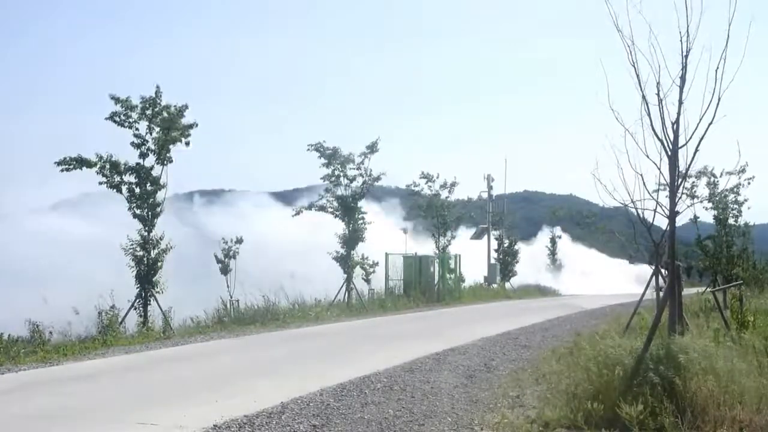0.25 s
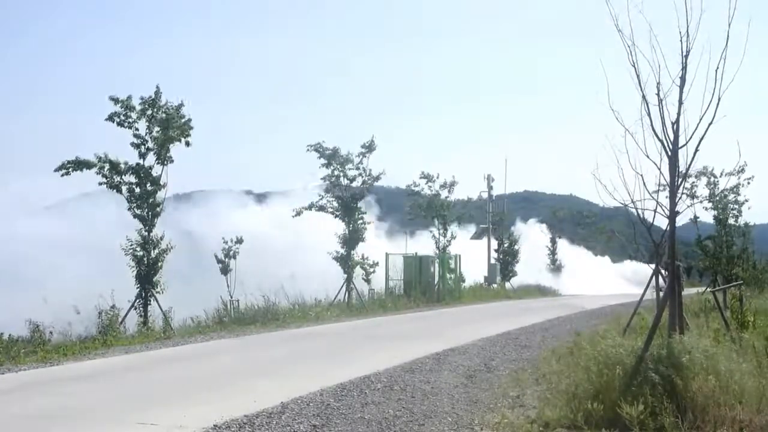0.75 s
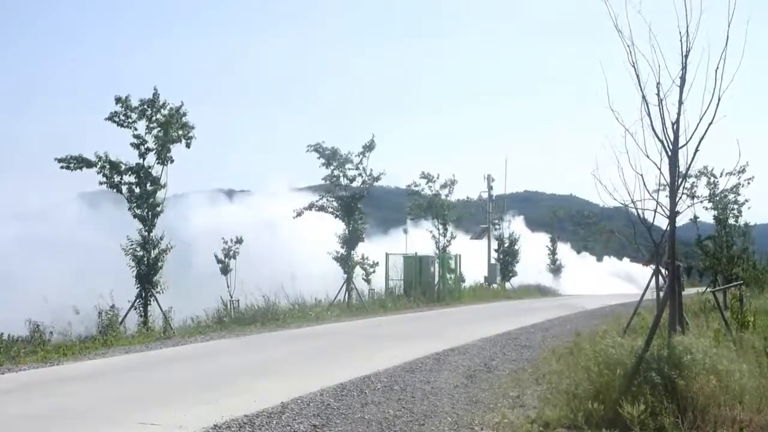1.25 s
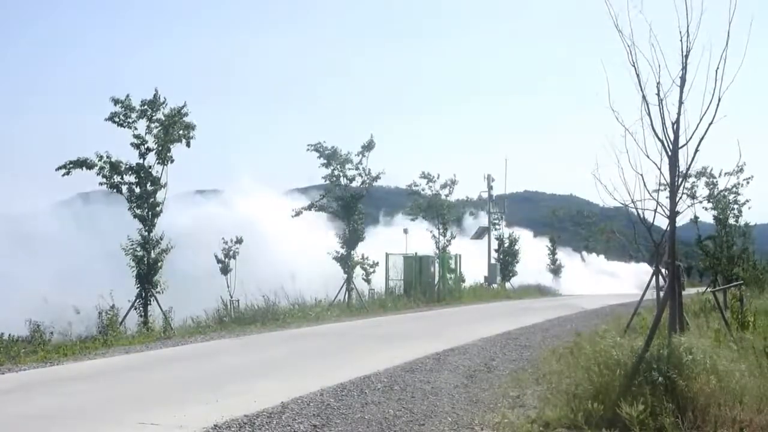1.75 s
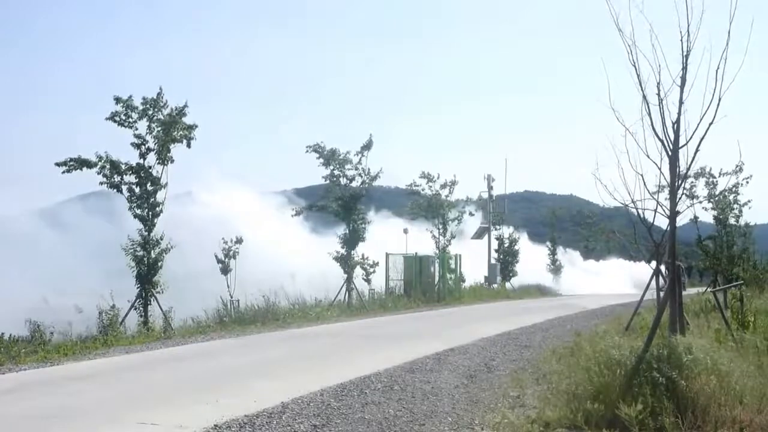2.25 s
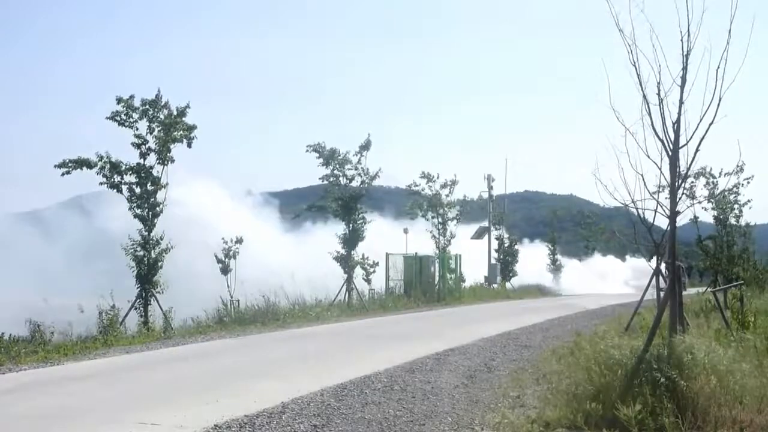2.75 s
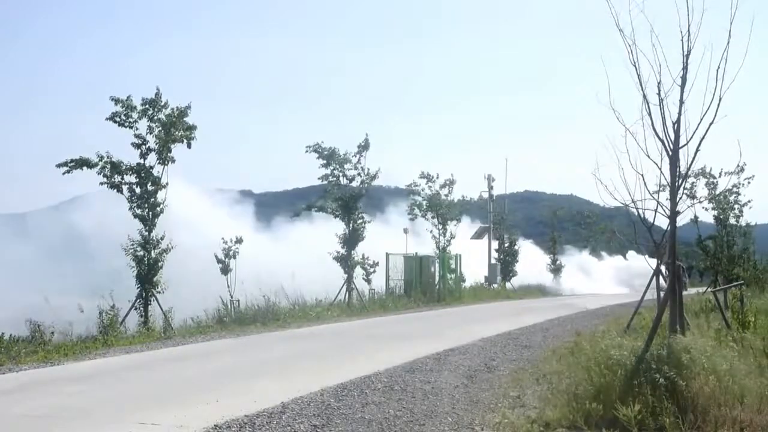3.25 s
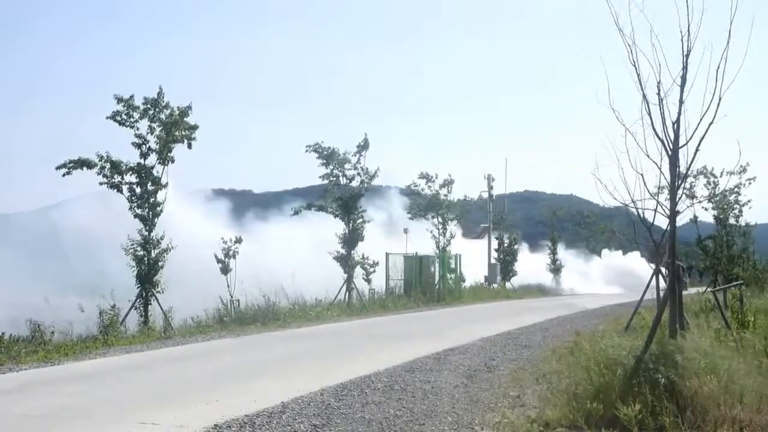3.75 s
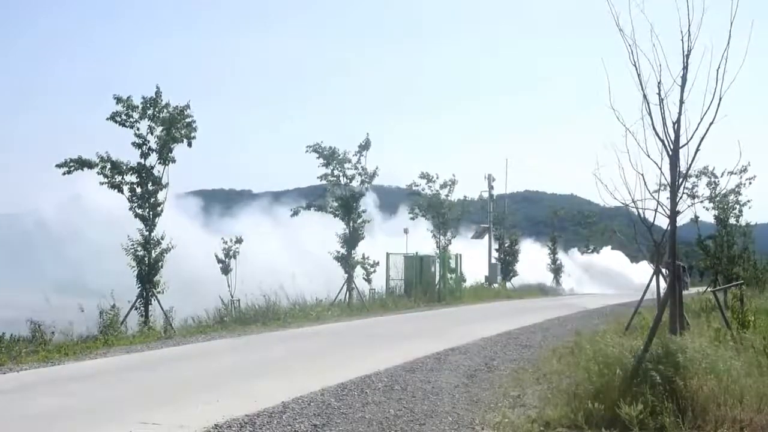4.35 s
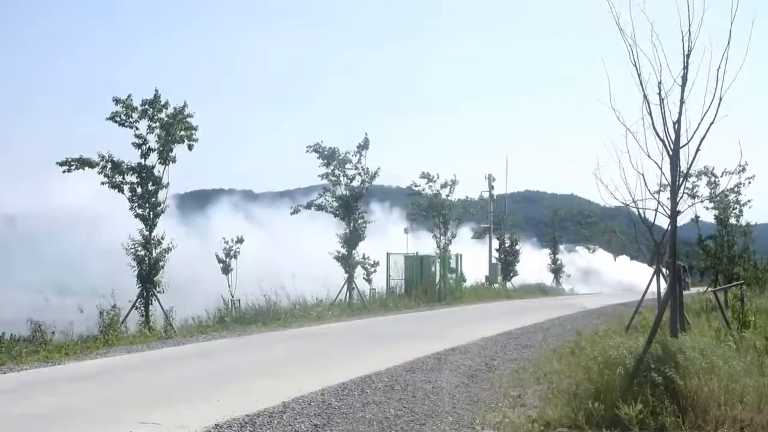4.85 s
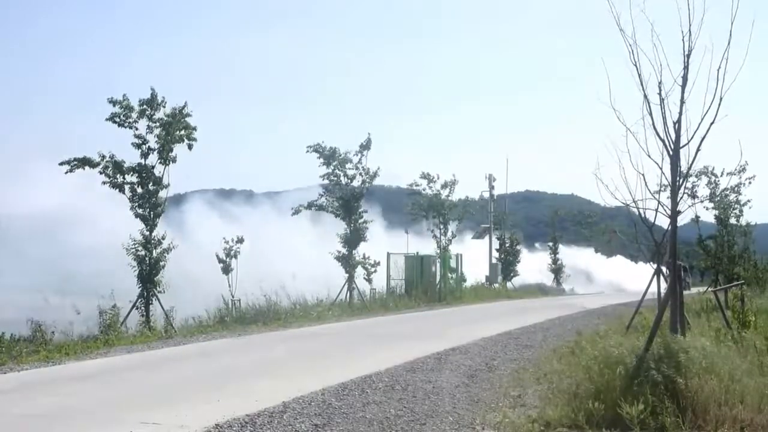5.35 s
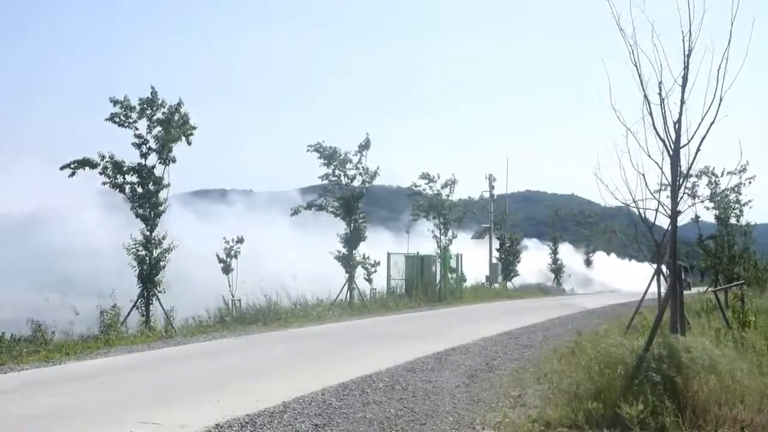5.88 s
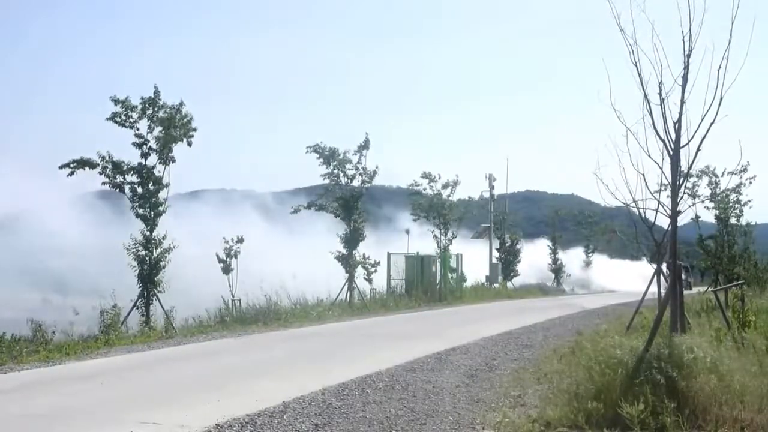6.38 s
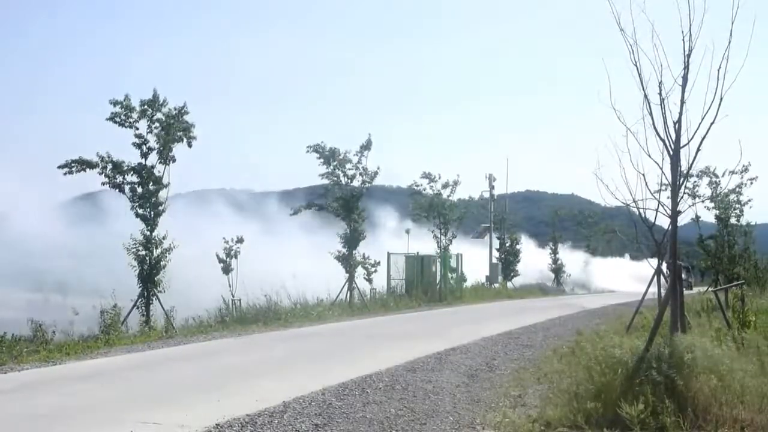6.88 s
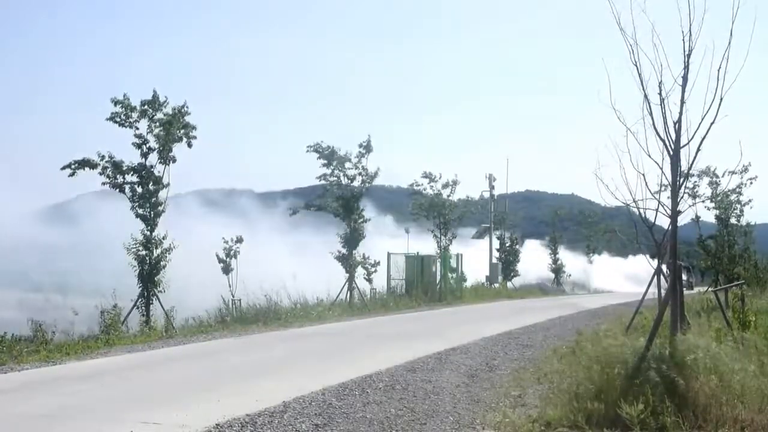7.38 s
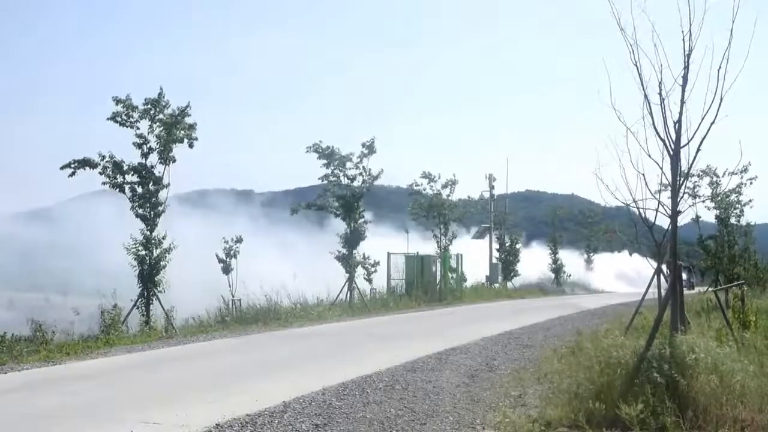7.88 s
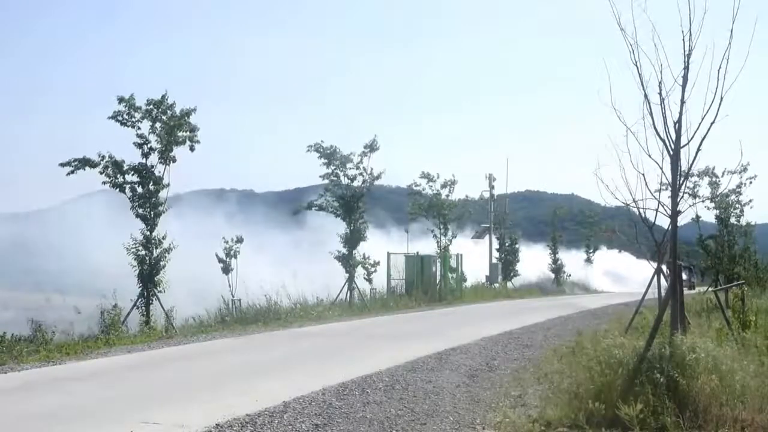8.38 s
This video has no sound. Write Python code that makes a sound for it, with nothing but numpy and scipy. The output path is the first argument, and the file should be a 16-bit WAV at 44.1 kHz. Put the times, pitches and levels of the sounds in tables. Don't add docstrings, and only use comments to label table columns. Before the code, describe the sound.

Outdoor roadside: a far-off buzzing engine drone with raspy roar under buffeting wind, faint hiss, a few bird chips and small close ticks.

```python
import sys
import numpy as np
from scipy import signal
from scipy.fft import rfft, irfft, next_fast_len
from scipy.io import wavfile
from scipy.ndimage import uniform_filter1d, map_coordinates

SR = 44100
rng = np.random.default_rng(int(sys.argv[2]) if len(sys.argv) > 2 else 0)


def generate_wav(signal):
    frames = np.transpose(np.atleast_2d(signal))
    scaled = np.clip(frames, -1, 1) * 32767
    pcm = np.round(scaled).astype(np.int16)
    wavfile.write(sys.argv[1], SR, pcm)


def level_to_linear(level):
    exponent = np.asarray(level, float) / 20
    return 10 ** exponent


N = 380274


def unit(x):
    return x / np.sqrt(np.mean(x ** 2) + 1e-20)


def along(points, hz):
    f, v = np.transpose(points)
    return np.interp(np.log(hz + 1), np.log(f + 1), v)


def curves(rows):
    s, *cols = np.transpose(rows)
    return [np.interp(np.arange(N) / SR, s, c) for c in cols]


def wobble(rate_hz):
    coarse = np.arange(0, N + 64, 64)
    knots = rng.standard_normal(1000)
    return np.interp(np.arange(N), coarse, map_coordinates(knots, [coarse * rate_hz / SR]))


def filtered(x, response):
    m = next_fast_len(N + SR // 2)
    return irfft(rfft(x, m) * response(np.fft.rfftfreq(m, 1 / SR)), m)[..., :N]


def coloured(spectrum):
    return unit(filtered(rng.standard_normal(N), lambda hz: level_to_linear(along(spectrum, hz))))


def even(x, span_s):
    return x / np.sqrt(np.abs(uniform_filter1d(x ** 2, size=int(span_s * SR))) + 0.027)


def swells(s, peak_db, half_s, calm_db):
    coarse = np.arange(0, N + 64, 64) / SR
    power = level_to_linear(2 * peak_db) @ np.exp(-((coarse - s[:, None]) / half_s) ** 2)
    return 10 * np.log10(np.interp(np.arange(N) / SR, coarse, power) + level_to_linear(2 * calm_db))


# time in seconds, gain just after in dB.
GAIN_DUCKS = [(0.0, -0.5), (.42, -2), (1.03, 0.9), (1.14, -1.5), (1.51, -1.1), (1.64, -2.5), (1.97, -1.5),
              (2.42, -2), (2.5, -4), (3.67, 3), (3.9, 0.4), (4.15, 0), (4.28, -2), (4.6, -1.5), (4.79, -4),
              (5.02, -4), (5.44, -4), (5.88, -4), (6.6, 4.5), (6.727, -.5), (6.96, -1.5), (7.35, -1),
              (7.71, 0), (8.23, 4), (8.55, 6)]
CLIMB_DB_PER_S, DUCK_S = 8.5, 0.027
LULL_START_S, LULL_END_S, LULL_EXTRA_DB_PER_S = 6.25, 6.56, 16.5


def gain_db():
    s, after_db = np.transpose(GAIN_DUCKS)
    t = np.arange(N) / SR

    def climb(t):
        return CLIMB_DB_PER_S * t + LULL_EXTRA_DB_PER_S * np.clip(t, LULL_START_S, LULL_END_S)

    last = np.clip(np.searchsorted(s, t, "right") - 1, 0, None)
    return uniform_filter1d(after_db[last] + climb(t) - climb(s[last]), size=int(DUCK_S * SR))


def resonant(x, modes, steep, turned=0):
    def response(hz):
        total = 0
        for k, (centre_hz, width_hz, db, *change_db) in enumerate(modes):
            peak = 1j * hz * width_hz / (centre_hz ** 2 - hz ** 2 + 1j * hz * width_hz)
            level = (-1) ** k * level_to_linear(db + turned * sum(change_db))
            total = total + level * peak * np.abs(peak) ** steep
        return total

    return unit(filtered(x, response))


# time in seconds, share turned 0-1.
TURNED_SHARE = [(0, 0), (1.5, 0), (3, 0.24), (4, 0), (4.6, 0.2), (5, 0.6), (6.3, .95), (7.4, .95),
                (8.62, 0.8)]


def swung(x, modes, steep):
    turn = np.clip(curves(TURNED_SHARE)[0], 0, 1)
    return (1 - turn) * resonant(x, modes, steep) + turn * resonant(x, modes, steep, turned=0.88)


def shimmer(x, patchy_db):
    z = signal.stft(x, nperseg=512)[2]
    field = uniform_filter1d(rng.standard_normal(z.shape[1:]), size=7, axis=0)
    field = uniform_filter1d(field, size=9, axis=1)
    return unit(signal.istft(z * level_to_linear(patchy_db * unit(field)), nperseg=512)[1][:, :N])


# frequency in Hz, likeness 0-1.
PORT_LIKENESS = [(200, 1), (1300, 0.86), (3000, 0.49), (6000, 0.73), (9000, 1)]


def spread(pair, lead_rad):
    def mid_side(hz):
        turn = np.arccos(np.clip(along(PORT_LIKENESS, hz), 0, 1)) / 2
        air = level_to_linear(-.9 * (hz / 3000) ** 2)
        return air * np.array([np.cos(turn), np.sin(turn)])

    def tilt(hz):
        phase = lead_rad * np.clip(hz / 1800, 0, 1)
        level = along([(1500, -0.1), (3000, 0.26), (6000, 0.23)], hz)
        return np.exp((1j * phase - level) * np.array([[.5], [-.5]]))

    mid, side = filtered(pair, mid_side)
    return filtered(np.array([mid + side, mid - side]), tilt)


# firing rate at start in Hz, at end in Hz, fundamental in dB before a fixed 36.5 dB
JET_RATES = [
    (80.75, 79.8, -36),
    (83.14, 84, -35),
]
# multiple of the firing rate, level in dB.
JET_ORDERS = [
    [(2, -1), (3.5, -14), (5, -21), (6, -15.5)],
    [(1.5, -11), (2, -4.5), (2.5, -16.5), (3.5, -13), (4, -18), (5, -44), (7, -24.5)],
]


def firings(drone_db, tube_db):
    tone, bursts = np.zeros(N), np.zeros(N)
    for (start_hz, end_hz, db), orders in zip(JET_RATES, JET_ORDERS):
        turns = np.cumsum(np.linspace(start_hz, end_hz, N) + .8 * wobble(4)) / SR
        for k, order_db in [(1, 0.0099), *orders]:
            level_db = db + 36.5 + order_db + 1.9 * wobble(5)
            if k > 3:
                level_db = level_db + tube_db - drone_db
            tone += level_to_linear(level_db) * np.sin(2 * np.pi * round(2 * k) / 2 * turns)
        strength_db = 3.6 * wobble(40) + 0.97 * (turns % 2 > 1)
        bursts += np.exp(-3.5 * (turns % 1)) * level_to_linear(strength_db)
    return tone, bursts


# centre in Hz, width in Hz, level in dB.
BODY_MODES = [(119, 35.3, -6.5), (189.8, 41.6, -4.5), (282.4, 18.6, -0.5), (321.8, 33, -7.5),
              (402, 15, -12), (466, 45, -14), (553, 29, -14), (588.3, 27, -11), (650.6, 44, -17),
              (693, 70, -18.5)]
# centre in Hz, width in Hz, level in dB, change once turned in dB.
PIPE_MODES = [(722, 25, 6, 1.5), (813.5, 36, 4, 0.5), (850.5, 28, 2, 5.5), (997, 84, 1, 0),
              (1069.3, 9.8, 8, 1), (1197, 72, 2.5, 2), (1373, 29, 4.5, -10), (1450, 58, 0.5, -14.5)]
# centre in Hz, width in Hz, level in dB, change once turned in dB.
NOZZLE_MODES = [(1752, 120, -11, 9.5), (1926, 72, -1.5, 3.5), (2170, 213, 0, -7.5), (2408, 215, 2.5, -6),
                (2823, 380, -3.5, -2.5), (3515, 390, -3.5, -5.5), (3990, 450, -4.5, -3.5),
                (4450, 300, -6.5, -2), (4930, 200, -5.5, -4.5), (5350, 410, -7, -2.5),
                (5710, 1930, -14, -3)]
# time in seconds, level in dB.
AIR_CLARITY = [(0, -1.5), (.55, 5), (1.0, 1.5), (1.3, 1.5), (1.9, -1), (2.4, -3), (3.2, -1), (3.75, 4),
               (4.3, 5.5), (4.75, 1.5), (5.8, -.5), (6.6, -1), (6.85, 2), (7.4, 2.1), (7.6, -3.5),
               (8.2, -2.5), (8.62, -6)]
# time in seconds, rise in dB.
RASP_FLARES = [(.39, -2), (.6, 1.5), (.8, 0), (1.25, 2), (2.3, 3), (3.55, 4), (3.81, 2.5), (4.1, 1.5),
               (4.55, 1), (5.0, 2.5), (5.36, 1.5), (6.6, 1), (7.22, 1)]
FLARE_HALF_S = 0.039
DRONE_DB, TUBE_DB, ROAR_DB, RASP_DB = -33.5, -37, -51, -56
TUBE_PER_GAIN_DB, TUBE_PER_CLARITY_DB = 0.83, -0.23
ROAR_PER_CLARITY_DB = 0.22


def jets():
    gain, (clear_db,) = gain_db(), curves(AIR_CLARITY)
    drone_db = DRONE_DB + gain
    tube_db = TUBE_DB + TUBE_PER_GAIN_DB * gain + TUBE_PER_CLARITY_DB * clear_db + 1.5 * wobble(4.5)
    roar_db = ROAR_DB + gain + ROAR_PER_CLARITY_DB * clear_db
    rasp_db = RASP_DB + gain + clear_db + .8 * wobble(14)
    for s, rise_db in RASP_FLARES:
        rasp_db += rise_db * np.exp(-((np.arange(N) / SR - s) / FLARE_HALF_S) ** 2)
    tone, bursts = firings(drone_db, tube_db)

    def flame(depth):
        return rng.standard_normal((2, N)) * (1 - depth + depth * unit(bursts))

    body = shimmer(resonant(flame(depth=.4), BODY_MODES, steep=.5), patchy_db=1.5)
    roar = shimmer(swung(flame(depth=0.31), PIPE_MODES, steep=0.037), patchy_db=1.0)
    rasp = shimmer(swung(flame(depth=.2), NOZZLE_MODES, steep=0.15), patchy_db=2.0)
    far = level_to_linear(tube_db) * body + level_to_linear(roar_db) * roar + level_to_linear(rasp_db) * rasp
    return spread(far, lead_rad=-0.63) + level_to_linear(drone_db) * tone


# time in seconds, peak in dB, brightness in dB.
SNAPS = [(0.666, -16, -19), (0.942, -16, -17), (1.032, -17, -13), (1.255, -16, -16), (1.4, -21, -13),
         (1.478, -13, -17), (1.66, -16, -13), (1.792, -11.5, -17), (2.372, -17.5, -11), (2.452, -28, -5),
         (2.582, -18.5, -21), (2.66, -15.5, -13), (2.763, -15.5, -24), (2.807, -15.5, -29),
         (2.838, -15, -31), (3.891, -8.5, -24), (4.588, -10, -16), (4.807, -21, -13), (4.856, -18, -27),
         (4.95, -16.5, -13), (5.013, -26, -1), (5.055, -15.5, -3), (5.104, -28.5, -4), (5.157, -18.5, -8),
         (5.21, -12.5, -9), (5.362, -17.5, -2.5), (5.427, -17.5, -20), (5.968, -15.5, -6.5),
         (7.395, -17.5, -13), (7.561, -18.5, -19)]
SPUTTER_DB, SPUTTER_SCATTER_DB = 3, 2


def snaps(flutter_db):
    dull, bright, t = np.zeros(N + SR), np.zeros(N + SR), np.linspace(-3, 3, 1200)
    when, size = rng.uniform(1000, N - 1000, 260), rng.uniform(size=260)
    sputter_db = flutter_db[when.astype(int)] + SPUTTER_DB - SPUTTER_SCATTER_DB * np.log(size + .05)
    sputter = np.c_[when / SR, sputter_db, -16 - 12 * size]
    for s, db, bright_db in [*SNAPS, *sputter]:
        at = round(s * SR) - len(t) // 2
        dull[at:][:len(t)] += level_to_linear(db - 4.5) * np.exp(-t ** 2 * 1.2)
        bright[at:][:len(t)] += level_to_linear(db + bright_db - 6) * np.exp(-t ** 2 * 3)
    low = coloured([(100, -26.5), (250, 4.5), (450, -8.0), (700, -30.0), (1200, -90.0), (3000, -120)])
    high = coloured([(300, -27.5), (600, 1), (900, -14), (1400, -23.5), (2200, -64), (4000, -120)])
    return dull[:N] * even(low, span_s=.022) + bright[:N] * even(high, span_s=.015)


# time in seconds, level in dB.
LEE_EDDIES = [(.22, -32), (.75, -27.5), (.99, -33), (1.4, -30), (2.3, -32), (2.69, -29), (3.3, -25.5),
              (3.6, -28), (3.85, -28), (4.07, -20.5), (4.5, -36), (4.73, -25), (5.2, -24.5), (6.07, -26.5),
              (6.27, -28), (6.66, -26), (7.04, -26.5), (7.26, -30), (7.59, -28), (8.14, -30), (8.55, -26)]
# frequency in Hz, density in dB per Hz.
LEE_SPECTRUM = [(3, -8), (10, 0), (30, -1), (70, -4), (100, -9), (150, -13), (200, -14), (260, -26),
                (400, -45), (1500, -120)]


def lee():
    level_db = swells(*np.transpose(LEE_EDDIES), half_s=0.056, calm_db=-40)
    return level_to_linear(level_db + 3.5) * unit(level_to_linear(1.5 * wobble(10)) * even(coloured(LEE_SPECTRUM), span_s=.15))


# time in seconds, rumble in dB, flutter in dB.
RIGHT_GUSTS = [(0.0, -16, -38.5), (.22, -20.5, -29.5), (.44, -20.5, -24.5), (.77, -21.5, -32),
               (.99, -22, -29), (1.14, -17, -30), (1.432, -21, -21.5), (1.7, -23, -27), (2.09, -22, -39),
               (2.42, -19.5, -26), (2.68, -23.5, -24), (3.13, -24.5, -31), (3.41, -27, -37),
               (3.63, -20, -40.5), (3.88, -18.5, -26.5), (4.27, -17, -27.5), (4.62, -18.5, -29.5),
               (4.84, -19, -32.5), (5.08, -20.5, -23.5), (5.41, -16, -29), (5.85, -21.5, -45),
               (6.08, -22.5, -41), (6.7, -19.5, -46), (6.92, -22, -28), (7.15, -23, -34),
               (7.37, -20, -33.5), (7.59, -20, -31), (7.81, -22, -31.5), (8.17, -24, -51),
               (8.52, -23.5, -49)]
# time in seconds, rumble in dB, flutter in dB.
BREEZE = [(0, -25, -40), (2.9, -22, -36), (4.45, -26.5, -42.5), (5.6, -23, -36), (6.15, -23, -32.5),
          (6.42, -29.5, -36.5), (6.8, -23, -45), (7.7, -23, -49), (8.0, -32, -54), (8.62, -27.5, -59)]
# frequency in Hz, density in dB per Hz.
RUMBLE_SPECTRUM = [(3, -45.5), (10, 6.5), (40, 9.5), (80, 6), (130, 2.5), (200, -11.5), (300, -19),
                   (500, -64), (1500, -120)]
# frequency in Hz, density in dB per Hz.
FLUTTER_SPECTRUM = [(30, -50.5), (100, -17.5), (200, 6.5), (300, -12), (450, -13), (600, -22.5), (800, -40),
                    (1200, -42), (3000, -120)]
GUST_HALF_S, FLUTTER_HALF_S = 0.068, 0.068


def wind():
    s, gust_db, flap_db = np.transpose(RIGHT_GUSTS)
    calm_db, still_db = curves(BREEZE)
    rumble_db = swells(s, gust_db, GUST_HALF_S, calm_db)
    flutter_db = swells(s, flap_db, FLUTTER_HALF_S, still_db)
    lumps = wobble(16)
    rumble = unit(level_to_linear(1.56 * lumps) * even(coloured(RUMBLE_SPECTRUM), span_s=.15))
    flutter = unit(level_to_linear(4.7 * wobble(45) + 1.55 * lumps) * coloured(FLUTTER_SPECTRUM))
    right = level_to_linear(rumble_db + 2.0) * rumble + level_to_linear(flutter_db - 2.0) * flutter + snaps(flutter_db)
    return np.array([lee() - 0.012 * right, right])


# frequency in Hz, density in dB per Hz.
HISS_SPECTRUM = [(500, -60), (2000, -12), (5000, 0), (7000, -1), (9000, -1.5), (11000, -5), (13000, -6.5),
                 (15000, -8), (17000, -9)]
HISS_LEFT_DB, HISS_RIGHT_DB, HISS_PER_GAIN_DB = -69.5, -68, 1.1


def hiss():
    level_db = HISS_PER_GAIN_DB * gain_db() + [[HISS_LEFT_DB], [HISS_RIGHT_DB]]
    return level_to_linear(level_db) * np.array([coloured(HISS_SPECTRUM), coloured(HISS_SPECTRUM)])


# time in seconds, centre in Hz, level in dB.
GRASS_SWEEP = [(3.45, 6400, -85), (3.75, 6050, -66), (4.1, 5700, -65), (4.5, 5400, -67), (4.9, 5200, -85),
               (5.26, 5700, -85), (5.33, 5650, -67), (5.42, 5600, -85)]


def grass():
    hz, db = curves(GRASS_SWEEP)
    band = [(150, -8.5), (350, -20.5), (700, -53.5), (1500, -120)]
    slow = np.array([coloured(band), coloured(band)])
    return level_to_linear(db) * slow * np.sin(2 * np.pi * np.cumsum(hz) / SR)


# time in seconds, level in dB, start in Hz, end in Hz, length in seconds.
BIRD_CHIPS = [
    (6.788, -60, 5600, 3980, .04),
    (7.2, -69, 5300, 3970, .03),
    (7.24, -70, 4400, 3770, .03),
    (7.984, -66, 5000, 3700, .045),
    (8.088, -65, 4500, 3800, .05),
    (4.172, -58, 5000, 3500, .03),
]


def birds():
    out = np.zeros(N + SR)
    for s, db, start_hz, end_hz, length_s in BIRD_CHIPS:
        u = np.linspace(0, 1, int(length_s * SR))
        hz = end_hz + (start_hz - end_hz) * (1 - u) ** 2
        chip = np.sin(np.pi * u) * np.sin(2 * np.pi * np.cumsum(hz) / SR)
        out[round(s * SR):][:len(u)] += level_to_linear(db) * chip
    t = np.arange(SR // 8) / SR
    echo = rng.standard_normal((2, len(t))) * level_to_linear(-60 * t / 0.077)
    echo = echo / np.linalg.norm(echo[0])
    return 1.2 * out[:N] + level_to_linear(7.5) * signal.fftconvolve(out[None], echo, axes=1)[:, :N]


# time in seconds, peak in dB, centre in Hz, width in Hz, length in seconds.
CLOSE_TICKS = [
    (7.266, -58, 12500, 2500, 0.0048),
    (7.318, -35.5, 5900, 1400, 0.0031),
    (7.319, -49, 12500, 3930, 0.0026),
    (7.532, -54, 10000, 4000, .006),
    (7.556, -41, 6260, 1800, 0.0023),
    (7.58, -58, 7340, 500, 0.02),
    (8.232, -50, 13700, 1500, 0.0053),
    (8.234, -43.5, 5530, 3000, 0.015),
    (8.321, -40, 10400, 4430, 0.0023),
    (8.3227, -45, 5000, 3000, 0.0033),
]
# time in seconds, left re right in dB.
TICK_PAN = [(7.6, -1.5), (8.2, 6)]


def ticks():
    out, t = np.zeros((2, N + SR)), np.arange(2000) / SR
    for s, db, hz, width_hz, length_s in CLOSE_TICKS:
        pan_db = np.interp(s, *np.transpose(TICK_PAN))
        edges_hz = np.clip([hz - width_hz / 2, hz + width_hz / 2], 500, 15000)
        band = signal.butter(2, edges_hz, "band", fs=SR)
        crack = signal.lfilter(*band, rng.standard_normal(len(t))) * level_to_linear(-30 * t / length_s)
        side_amp = level_to_linear(db + pan_db * np.array([[.5], [-.5]]))
        out[:, round(s * SR):][:, :len(t)] += side_amp * crack / np.abs(crack).max()
    return out[:, :N]


def scene():
    return jets() + wind() + hiss() + grass() + birds() + ticks()


def roll_off(x):
    return signal.sosfilt(signal.butter(12, 14990, fs=SR, output="sos"), x)


def record(dry):
    soft = dry / (1 + np.abs(dry / .7) ** 4) ** .25
    return roll_off(soft)


dry = scene()
out = record(dry)
generate_wav(out)
```